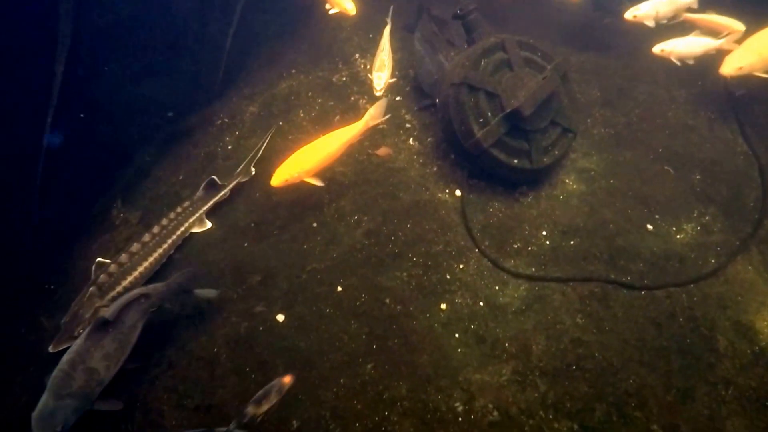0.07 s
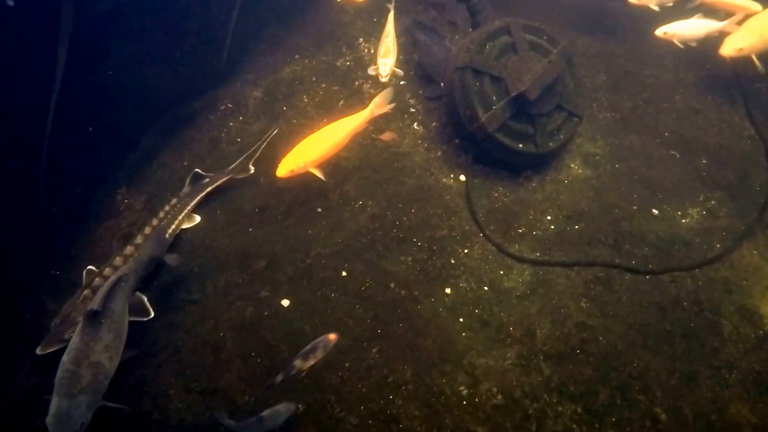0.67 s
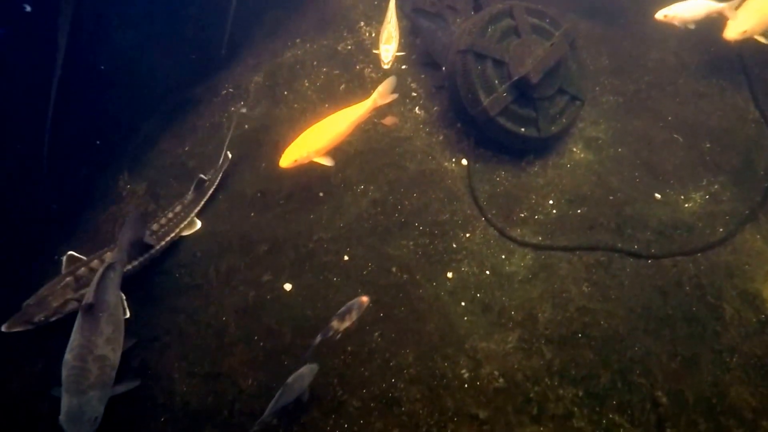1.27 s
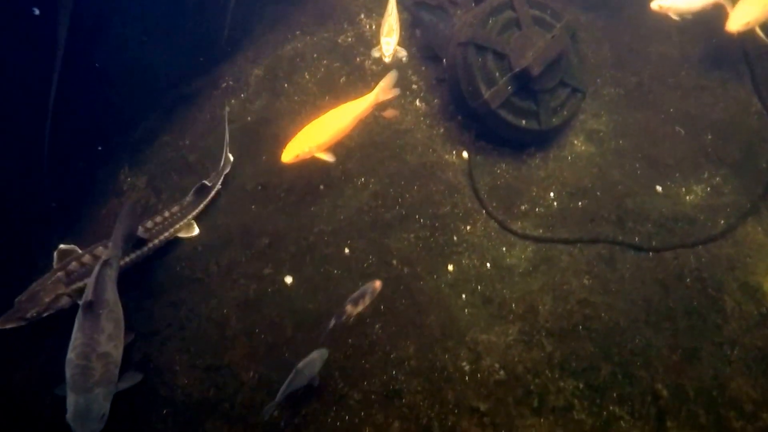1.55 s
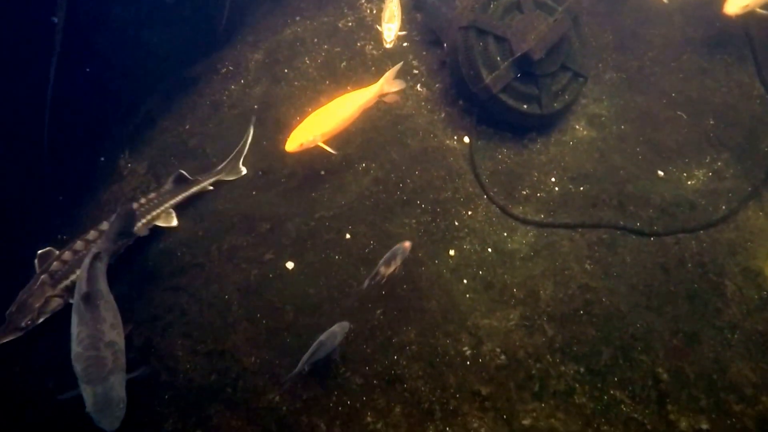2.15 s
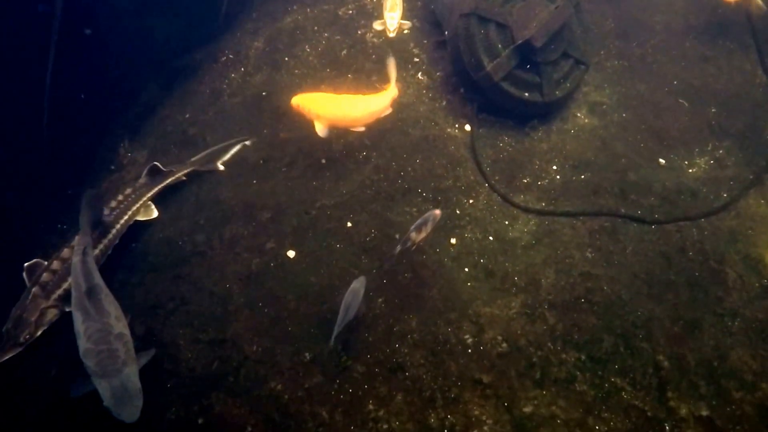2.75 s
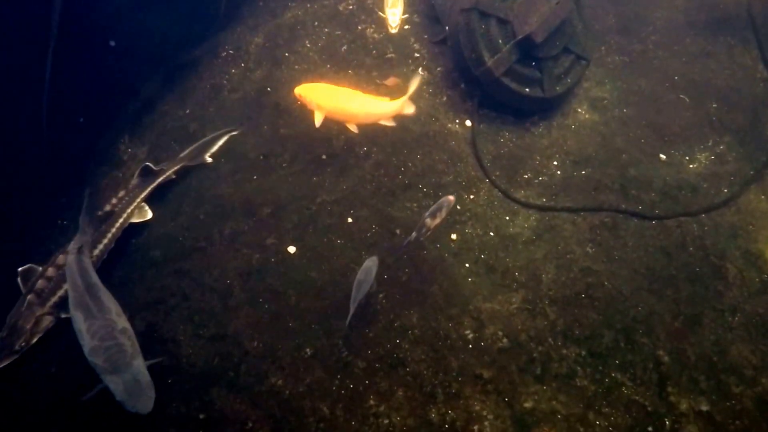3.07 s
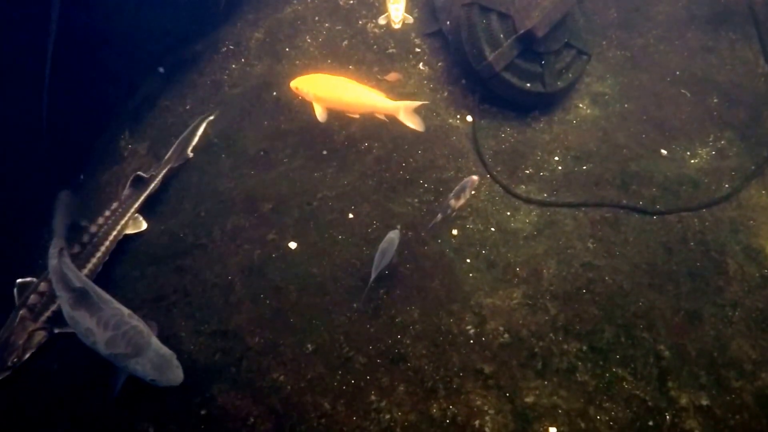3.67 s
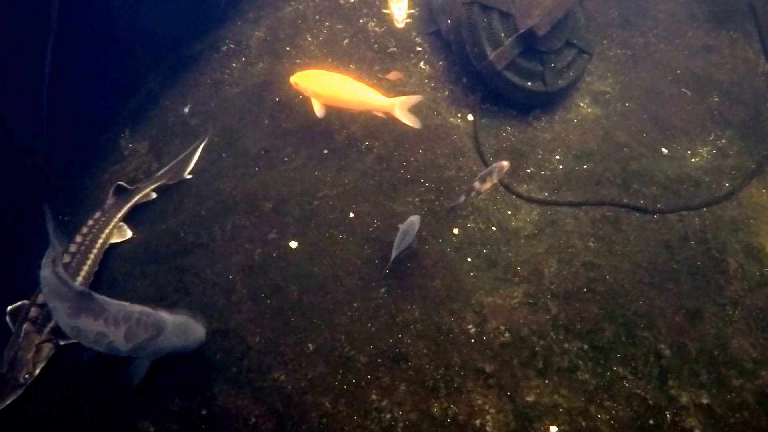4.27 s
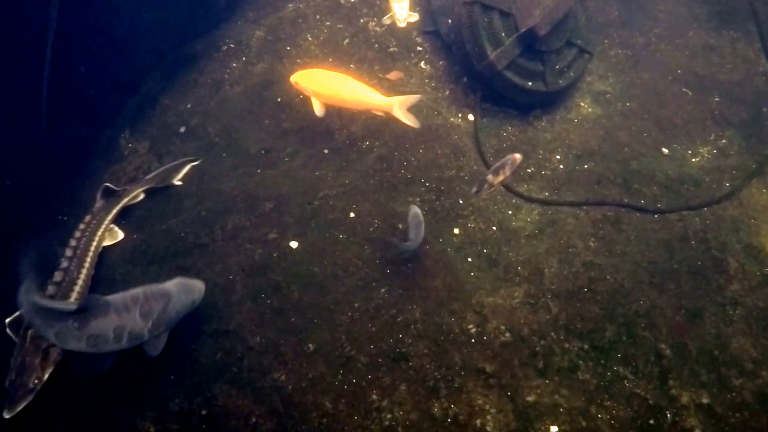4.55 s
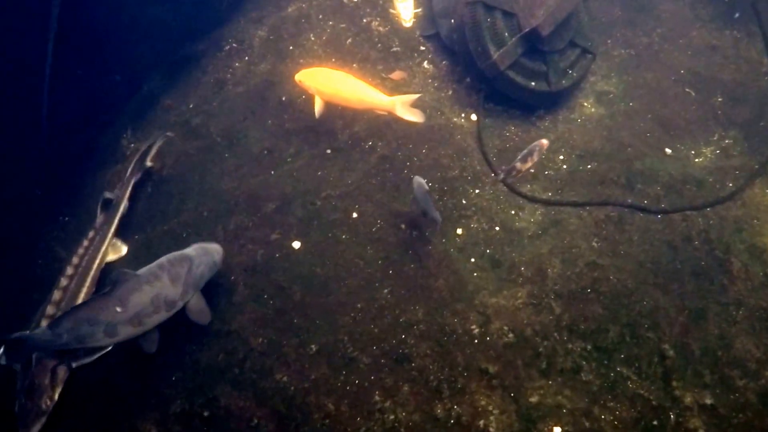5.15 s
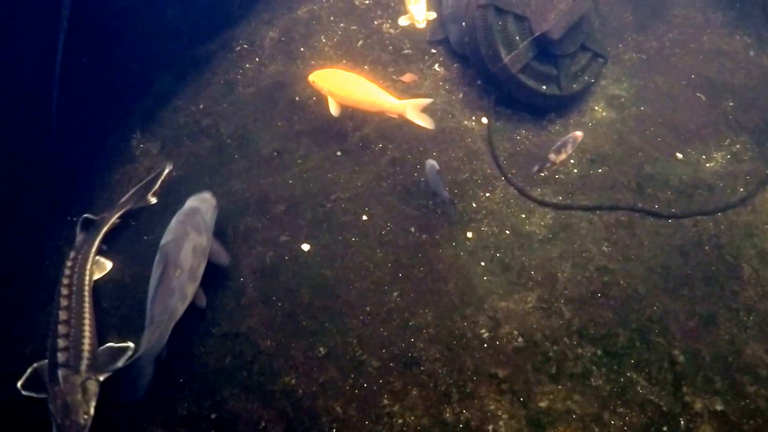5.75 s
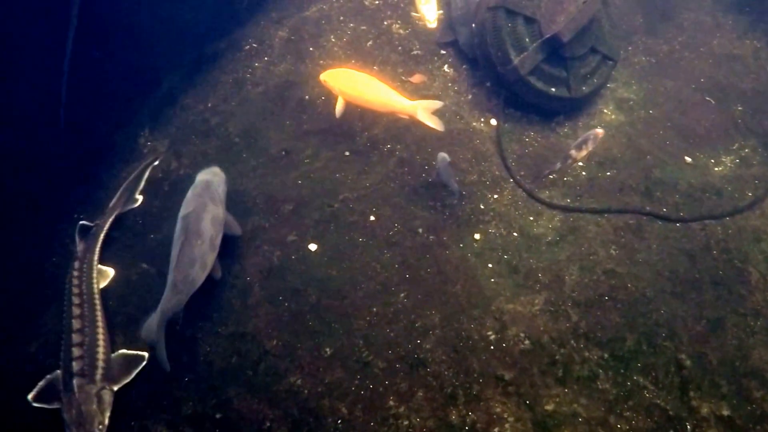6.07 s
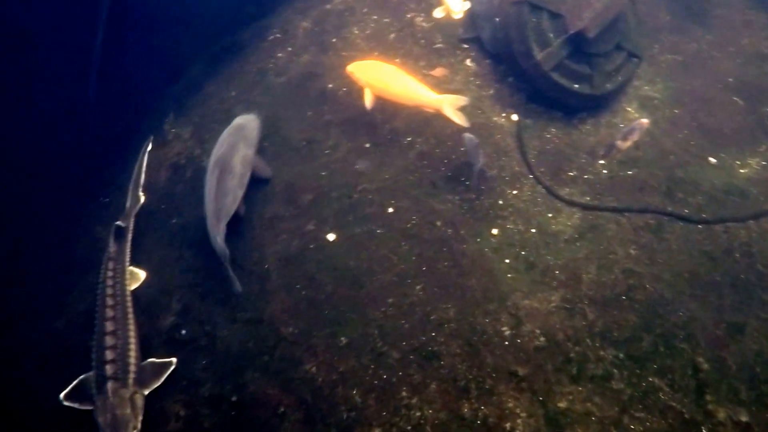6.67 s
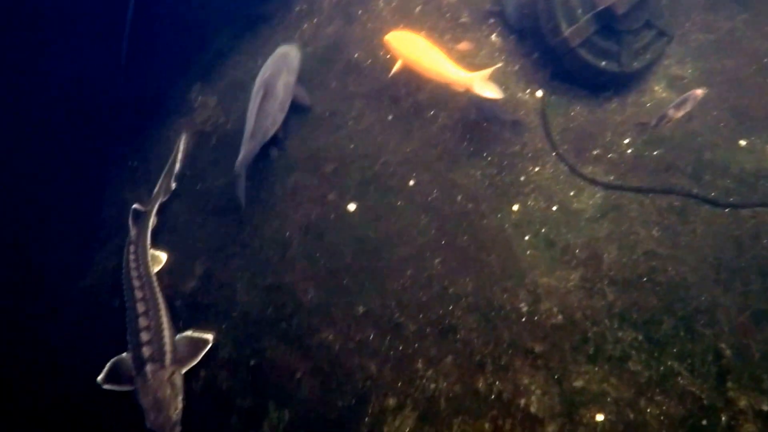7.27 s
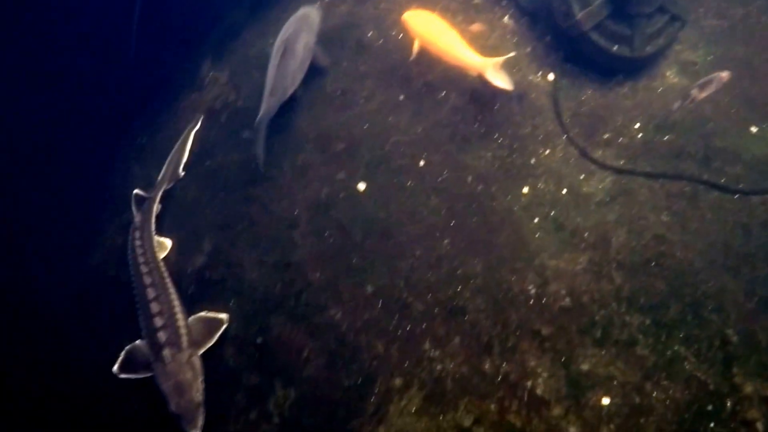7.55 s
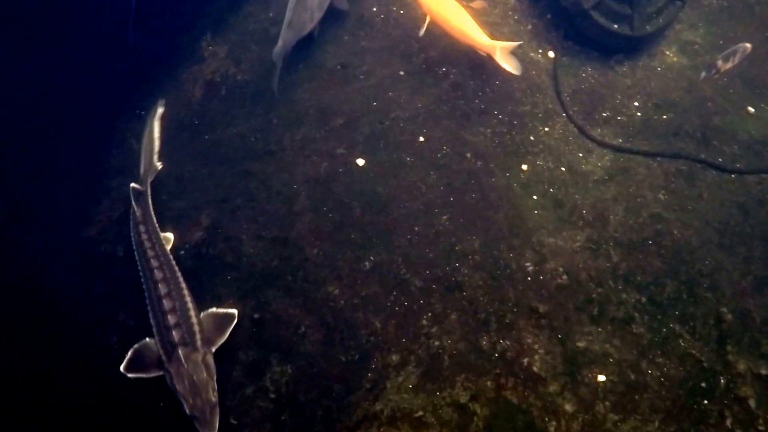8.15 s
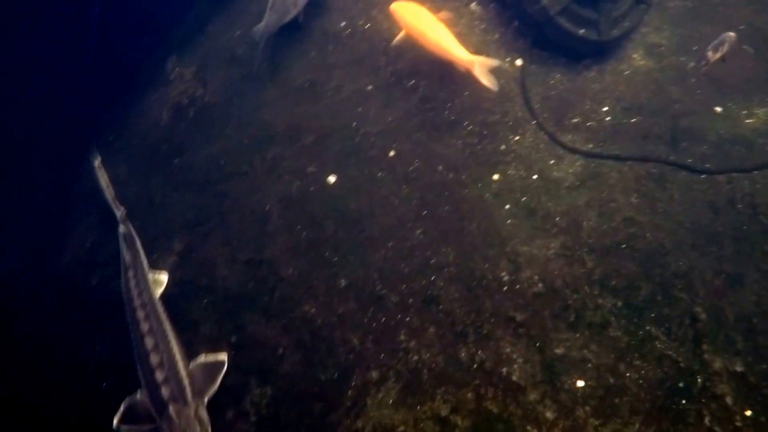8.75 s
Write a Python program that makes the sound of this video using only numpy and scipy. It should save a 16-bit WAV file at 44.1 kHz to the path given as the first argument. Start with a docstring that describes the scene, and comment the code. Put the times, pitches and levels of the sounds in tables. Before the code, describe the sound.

Low underwater pump drone with soft water thuds and faint bubbles, interrupted by hollow rubbing and hard knocks on the microphone housing.

```python
"""A low hum under water: a pump in a garden pond, droning at twice the mains frequency over its own churn.
Swirls of water thump against a camera housing, flexing its wall, and small bubbles ring and tick.
Midway a hollow rush rubs along the housing and sounds its resonances while knocks rattle and rock it;
the hardest make the limiter duck. A thin hiss lies behind it all."""
import sys
import numpy as np
from scipy import signal
from scipy.fft import rfft, irfft, next_fast_len
from scipy.io import wavfile
from scipy.ndimage import uniform_filter1d, minimum_filter1d, map_coordinates

SR = 44100
rng = np.random.default_rng(int(sys.argv[2]) if len(sys.argv) > 2 else 0)


def dump(signal):
    """Clip the signal to [-1, 1] and save it as 16-bit WAV at the path in sys.argv[1]."""
    limited = np.clip(np.atleast_2d(signal).T, -1, 1)
    pcm = np.round(limited * 32767).astype(np.int16)
    wavfile.write(sys.argv[1], SR, pcm)


N = 388236

# the pump's hum at the housing: t/s, level/dB
HUM_LEVEL = [(0, -27), (0.15, -27.5), (0.35, -22.5), (0.8, -22.5), (0.97, -28), (1.2, -26.5), (1.36, -30.5),
             (1.62, -22.5), (2.3, -21), (4.85, -20.7), (5.0, -21.5), (5.25, -23.5), (5.52, -29.5),
             (5.88, -22.5), (6.6, -26.5), (7.0, -29), (7.4, -24), (8.8, -22)]
# overtones of the hum: harmonic number, level/dB against the fundamental
HUM_OVERTONES = [(2, -23.5), (3, -29), (4, -30.5), (5, -44), (11, -54)]
# the strongest pushes of water: t/s, strength/dB, nominal f/Hz (the wall sounds lower)
PUSHES = [(0.019, -16, 184), (0.22, -16, 147), (0.372, -6, 166), (0.446, -16.5, 185), (0.54, -17.5, 151),
          (0.757, -15, 130), (0.779, -12, 80), (0.802, -10, 103), (0.826, -12, 116), (0.896, -8.5, 111),
          (1.129, -12.5, 160), (1.163, -14, 121), (1.315, -20, 86.6), (1.624, -15, 157),
          (1.705, -13, 109.5), (2.344, -12.5, 144), (2.722, -11.5, 176), (2.973, -12.5, 129),
          (4.121, -13, 134), (4.809, -10, 192), (4.902, -18.5, 170), (5.161, -16, 201), (5.302, -9, 152.5),
          (5.338, -2, 212), (5.367, -9, 117.6), (5.823, -12, 155), (5.937, -10.5, 139), (6.014, -11.5, 148),
          (6.161, -10, 153), (6.215, -7.5, 172), (6.395, -7.5, 168), (6.462, -13, 189), (6.544, -10, 156.2),
          (6.647, -6.5, 138), (6.708, -18, 152), (6.858, -17.5, 143), (7.02, -14.5, 145), (7.034, -17, 261),
          (7.349, -13.5, 132), (7.368, -13.5, 65), (7.15, -13.5, 157), (7.393, -15, 113), (7.519, -7.5, 45),
          (7.662, -17.5, 163.3), (7.735, -9, 87), (7.892, -8, 44.3), (7.906, -8.5, 149), (8.225, -14, 154),
          (8.396, -15.5, 254), (8.466, -9.5, 125), (8.619, -7, 136.8), (8.768, -11, 159)]
# swirls round the housing: t/s, hold/s, strength/dB
SWIRLS = [(0.208, 0.43, -1), (.75, 0.099, -6.5), (1.117, 0.078, 2.5), (1.244, .2, -7.5), (1.53, .2, 3),
          (5.28, .14, 0), (5.819, 0.16, -3), (6.162, 0.53, 2), (6.773, 0.1302, -5.5), (7.116, .42, -2.5),
          (8.433, .38, -0.5)]
# sharp knocks: t/s, level/dB, nominal f/Hz (the body sounds lower), tick/dB against the body
KNOCKS = [(.895, -34, 560, -15), (1.129, -24, 414, -19), (2.905, -35, 600, -23), (3.527, -18.5, 433, -30),
          (3.968, -7, 396, -24), (4.026, -12, 713, -34), (4.03, 7, 540, -24.5), (4.113, 3, 478, -39),
          (4.512, -7.5, 401, -38), (4.804, -7.5, 446, -21), (4.886, -3, 453, -39), (4.903, -6.5, 243, -17),
          (4.932, 7, 1216, -42), (4.934, 17.5, 450, -33), (4.965, 13.5, 501, -36), (5.038, -8, 203, -24),
          (5.055, -6.5, 740, -24), (5.157, -7, 288, -30), (5.296, -10, 629.3, -35), (5.319, -8.5, 435, -34),
          (5.335, 11, 473, -24), (5.356, 8, 494, -37), (5.395, -1.5, 440, -38), (5.438, -11, 400, -37),
          (5.505, -12, 420, -26), (5.822, -13, 410, -22), (7.031, -24, 395, -16), (7.504, -31.5, 570, -31),
          (7.597, -25.5, 471, -15), (8.396, -36, 375, -14), (8.636, -25.5, 680, -35)]
# swell of the rush: t/s, level/dB
RUSH_LEVEL = [(3.15, -96), (3.42, -45.5), (3.7, -35.5), (4.0, -33.5), (4.3, -29), (5.05, -30),
              (5.35, -40.5), (5.9, -61.5), (6.2, -85.5)]
# colour of water rubbing on the wall: f/Hz, level/dB
RUSH_SPECTRUM = [(30, -11), (100, 7), (230, -8.5), (550, 3), (720, -4), (1000, -9), (1300, -13),
                 (1550, -24.5), (2200, -26.5), (2600, -34), (3400, -37.5), (5200, -34.5), (8000, -41),
                 (14000, -62.5)]
# resonances of the housing: f/Hz, width/Hz, lift/dB
HOUSING_MODES = [(424, 91, 10), (871, 45, 8), (1116, 150, 8.5), (1392, 91, 12.5), (1650, 59, 17),
                 (1850, 41, 9), (2000, 250, 9.5), (2675, 75, 9), (2964, 110, 8)]
# balance of the two ports as the housing rocks: f/Hz, left over right/dB
PORT_TILT = [(60, -5), (200, 5.5), (370, 7.5), (550, 8.5), (700, -2), (900, -5), (1300, -2.5), (2300, -1),
             (8000, -5.5)]
# phase between the rocking ports: f/Hz, left lead/rad
PORT_LEAD = [(60, 1.6), (150, 1.7), (250, 3), (450, 3.91), (700, 3.7), (900, 3), (1300, 1.99), (2300, 1.66),
             (3200, 0.68), (8000, 2.3)]
# bubbles, from tiny ticks to deep plops: t/s, strength/dB, f/Hz, t60/s
BUBBLES = [(.452, -50, 4250, 0.037), (.454, -56, 8000, .03), (.885, -9, 125, .11),
           (1.13, -22.5, 298, 0.063), (2.948, -55, 4660, 0.037), (2.95, -51.5, 9040, .025),
           (3.62, -53, 5350, 0.035), (4.19, -47.5, 4400, 0.041), (4.265, -49, 5160, .041),
           (4.495, -45, 3020, .037), (4.78, -45.5, 4650, 0.045), (4.822, -28.5, 1374, 0.082),
           (5.916, -25.5, 596, .028), (6.775, -59, 6300, .05), (8.215, -53.5, 4420, 0.036),
           (8.295, -55, 4245, 0.035), (8.631, -20, 990, 0.021)]
# colour of the water's slow sway: f/Hz, level/dB
RUMBLE_SPECTRUM = [(5, -19), (14, -11), (28, -2.5), (55, -5), (85, -8.5), (130, -14.5), (250, -64),
                   (500, -120)]
# colour of the lumpy churn: f/Hz, level/dB
CHURN_SPECTRUM = [(40, -33), (110, 3), (170, 3), (260, -11.5), (400, -24.5), (600, -50.5), (1200, -120)]
# flow through the pump: t/s, level/dB
FLOW_LEVEL = [(0, -42.5), (1.2, -43), (2.3, -42), (3.4, -41.5), (3.7, -45.5), (4.4, -38), (4.9, -39.5),
              (5.1, -44), (5.65, -49.5), (6.05, -42), (8.1, -45.5), (8.8, -42)]
# colour of that flow: f/Hz, level/dB
FLOW_SPECTRUM = [(100, -19.5), (260, 2.5), (330, 0.5), (420, -3), (480, -12.5), (570, -17), (690, -17),
                 (780, -17), (880, -20.5), (1080, -18.5), (1250, -26), (2000, -35.5), (3200, -46.5),
                 (6000, -81)]
# resonances of the pump and its pipe: f/Hz, width/Hz, lift/dB
PIPE_MODES = [(297, 25, 7.5), (353, 9.2, 1.5), (402, 35, 6.5), (435, 5.3, 6), (555, 43, 6.5),
              (670, 34, 6.5), (882, 50, 8), (1060, 87, 3)]
# swells of the pipe's drone: t/s, level/dB
DRONE_LEVEL = [(0, -64), (1.7, -57), (2.3, -44), (3.3, -43.5), (3.65, -58.5), (5.8, -69), (6.1, -46.5),
               (6.9, -52), (8.8, -71)]
# colour of the drone: f/Hz, level/dB
DRONE_SPECTRUM = [(240, -49.5), (330, -4), (400, 0.5), (450, -6), (520, -15), (700, -59)]
# colour of the hiss: f/Hz, level/dB
HISS_SPECTRUM = [(300, -29.5), (1500, 7), (3300, -5), (3900, -2), (6300, -3), (7400, -4.5), (8600, 0.5),
                 (10000, -0.5), (12000, -7.5), (13800, -12.5), (15200, -33)]
# stereo width of the hiss: f/Hz, side against mid/dB
HISS_WIDTH = [(3000, -31), (9500, -29), (11500, -13), (14000, 0.5)]


def pump_hum(hum_hz=100):
    """The motor's magnetic hum and weak overtones, growing and fading on their way through the water."""
    phase = 2 * np.pi * hum_hz * np.arange(N) / SR
    tone = np.cos(phase)
    for harmonic, db in HUM_OVERTONES:
        gain = amp(db + 3.16 * wobble(2.7))
        tone += gain * np.cos(round(harmonic) * phase + rng.uniform(0, 2 * np.pi) + 0.32 * wobble(6.6))
    return np.sqrt(2) * amp(fader(HUM_LEVEL) + 0.17 * wobble(6.8)) * tone


def thuds(loose_db=21.5):
    """Soft pushes of water flex the wall slowly; while the rush pulls at the housing they also rock it."""
    thumps = np.zeros(N)
    pushes = list(PUSHES) + eddies()
    for (s, db, hz), turn in zip(pushes, rng.uniform(0, 2 * np.pi, len(pushes))):
        wave, peak_s = wall_flex(hz * 0.77, below=1.0, above=0.48, sweep=3.04, turn=turn)
        add(thumps, s - peak_s, amp(db + 1) * wave)
    rocking = np.clip(amp(fader(RUSH_LEVEL) + loose_db), 0, 1) * thumps
    return thumps + np.array([rocking, far_port(rocking)])


def eddies(per_s=14, level_db=-18.5, scatter_db=2.5, nominal_hz=150, scatter_oct=0.33):
    """Small, unevenly spaced pushes that follow the strength of the swirl shedding them; rows as PUSHES."""
    jitter, sizes, pitches = rng.standard_normal((400, 3)).T
    times = (np.arange(len(jitter)) + .3 * jitter) / per_s
    strength = np.interp(times, np.arange(N) / SR, swirling(), right=0)
    return [(s, level_db + 20 * np.log10(gain) + scatter_db * size, nominal_hz * 2 ** (scatter_oct * pitch))
            for s, gain, size, pitch in zip(times, strength, sizes, pitches) if gain > .1]


def swirling(attack_s=.025, release_s=.05):
    """Strength of the swirling as a gain: each swirl rises, holds and dies away."""
    t = np.arange(N) / SR
    strength = np.zeros(N)
    for s, hold_s, db in SWIRLS:
        rise = np.clip((t - s) / attack_s + 1, 0, 1)
        fall = np.exp(-np.maximum(t - s - hold_s, 0) / release_s)
        strength += amp(db) * rise * fall
    return strength


def knocks(tick_ahead_s=0.0014, rock_from_db=-23.5, rock_span_db=8.5, crack_hz=2500, crack_from_db=-20.5):
    """Hard contacts flex the wall fast, a bright tick running ahead; strong ones rock the whole housing."""
    centred, rocking = np.zeros((2, N))
    for (s, db, hz, tick_db), turn in zip(KNOCKS, rng.uniform(0, 2 * np.pi, len(KNOCKS))):
        body, peak_s = wall_flex(hz * .85, below=.68, above=.38, sweep=4, turn=turn)
        tick, _ = wall_flex(hz * 2.44, below=.44, above=.27, sweep=4.8, turn=turn)
        tick = np.roll(tick, round((peak_s - tick_ahead_s) * SR) - np.argmax(abs(tick)))
        wave = amp(db) * (body + amp(tick_db) * tick)
        rock_share = np.clip((db - rock_from_db) / rock_span_db, 0, 0.99)
        add(centred, s - peak_s, (1 - rock_share) * wave)
        add(rocking, s - peak_s, rock_share * wave)
        if db + tick_db > crack_from_db:  # only the very hardest blows also crack
            crack, crack_peak_s = wall_flex(crack_hz, below=.6, above=.42, sweep=2.5, turn=turn)
            add(rocking, s - crack_peak_s, amp(db + tick_db - 7) * crack)
    return centred + np.array([rocking, far_port(rocking)])


def wall_flex(hz, below, above, sweep, turn, size=16384):
    """A few falling cycles, as bending waves bring their highs first; returns the wave and its peak time."""
    log_ratio = np.log((np.fft.rfftfreq(size, 1 / SR) + 1e-3) / hz)
    width = np.where(log_ratio < 0, below, above)
    band = np.exp(-.5 * (log_ratio / width) ** 2)
    phase = turn - sweep * log_ratio
    wave = np.fft.fftshift(np.fft.ifft(band * np.exp(1j * phase), size))
    peak = np.argmax(abs(wave))
    return wave.real / abs(wave[peak]), peak / SR


def far_port(left):
    """Rocking drives the housing's two ports against each other: the right one's answer to the left."""
    return filtered(left, lambda hz: amp(-along(PORT_TILT, hz)) * np.exp(-1j * along(PORT_LEAD, hz)))


def rush(spread=0.49):
    """Water rubs along the housing, rocks it and sounds its hollow resonances."""
    left, right = noise(RUSH_SPECTRUM) + spread * np.array([noise(RUSH_SPECTRUM), noise(RUSH_SPECTRUM)])
    rub = resonate(np.array([left, far_port(right)]), HOUSING_MODES)
    return amp(fader(RUSH_LEVEL) + 0.89 * wobble(25)) * unit(rub)


def bubbles(attack_s=0.0041, unsteadiness=0.3):
    """Each bubble rings briefly, its pitch so unsteady that the tiny ones crackle."""
    track = np.zeros(N)
    t = np.arange(SR // 8) / SR
    for s, db, hz, t60 in list(BUBBLES) + torn_bubbles():
        flutter = uniform_filter1d(rng.standard_normal(len(t)), size=int(SR / hz) + 1)
        pitch_hz = hz * (1 + unsteadiness * flutter)
        envelope = 2 * amp(db - 60 * t / t60) * (1 - np.exp(-t / attack_s))
        add(track, s, envelope * np.sin(2 * np.pi * np.cumsum(pitch_hz) / SR))
    return track


def torn_bubbles(count=14, offset_db=-19, centre_hz=5600, t60_s=0.031):
    """The rush tears off tiny bubbles at random, their strength following its own; rows as BUBBLES."""
    rush_s, rush_db = np.transpose(RUSH_LEVEL)
    moments, octaves = rng.uniform(size=(count, 2)).T
    times = rush_s[1] + (rush_s[-3] - rush_s[1]) * moments
    return [(s, np.interp(s, rush_s, rush_db) + offset_db, centre_hz * 2 ** (octave - .5), t60_s)
            for s, octave in zip(times, octaves)]


def water_bed(calm_rumble_db=-30, swirl_rumble_db=-27.5, calm_churn_db=-42.5, swirl_churn_db=-33):
    """Slow sway and lumpy churn, both lifted by the swirls, and the flow through the pump's pipe."""
    swirl = swirling()
    rumble_gain = np.hypot(amp(calm_rumble_db), amp(swirl_rumble_db) * swirl)
    rumble = rumble_gain * amp(1.6 * wobble(4)) * noise(RUMBLE_SPECTRUM)
    churn_gain = np.hypot(amp(calm_churn_db), amp(swirl_churn_db) * swirl)
    churn = churn_gain * amp(3.5 * wobble(35)) * noise(CHURN_SPECTRUM)
    flow_gain = amp(fader(FLOW_LEVEL) + 1.3 * wobble(8.9))
    flow = flow_gain * unit(resonate(noise(FLOW_SPECTRUM), PIPE_MODES))
    return rumble + churn + flow


def pipe_drone():
    """A narrow, hollow resonance of the pump's pipe swells and fades."""
    return amp(fader(DRONE_LEVEL) + 1.2 * wobble(7.1)) * noise(DRONE_SPECTRUM)


def hiss(level_db=-63):
    """A thin, even hiss, wide only at the very top."""
    side = filtered(noise(HISS_SPECTRUM), lambda hz: amp(along(HISS_WIDTH, hz)))
    return amp(level_db) * (noise(HISS_SPECTRUM) + np.array([side, -side]))


def limiter(x, limit_db, release_s=0.19, linger_share=0.38, linger_db_per_s=7, window=128):
    """Peaks over the limit duck the gain just ahead of them; it returns quickly at first, then slowly."""
    t = np.arange(N) / SR
    peak_db = 20 * np.log10(abs(x).max(axis=0) + 1e-9)
    over_db = np.maximum(peak_db - limit_db, 1e-9)
    quick_db = np.exp(np.maximum.accumulate(np.log(over_db) + t / release_s) - t / release_s)
    slow_db = np.maximum.accumulate(linger_share * over_db + linger_db_per_s * t) - linger_db_per_s * t
    gain_db = minimum_filter1d(-np.maximum(quick_db, slow_db), size=window)
    return x * amp(uniform_filter1d(gain_db, size=window))


def amp(db):
    """Decibels to gain."""
    return 10 ** (np.asarray(db) / 20)


def unit(x):
    """Scale to rms 1."""
    return x / np.sqrt(np.mean(x ** 2) + 1e-20)


def along(points, hz):
    """Read rows of f/Hz, value on a log frequency axis."""
    f, values = np.transpose(points)
    return np.interp(np.log(hz + 1), np.log(f + 1), values)


def fader(points):
    """A level for every sample, from rows of t/s, level/dB."""
    return np.interp(np.arange(N) / SR, *np.transpose(points))


def wobble(rate):
    """A smooth random curve, rate knots a second."""
    knots = rng.standard_normal(int(N * rate / SR) + 4)
    return map_coordinates(knots, [np.arange(N) * rate / SR])


def filtered(x, response):
    """Shape x with a complex response of frequency."""
    size = next_fast_len(N + SR // 2)
    return irfft(rfft(x, size) * response(np.fft.rfftfreq(size, 1 / SR)), size)[..., :N]


def resonate(x, modes):
    """Colour x with a bell-shaped lift at each resonance."""
    return filtered(x, lambda hz: amp(sum(db / (1 + (2 * (hz - f) / width) ** 2) for f, width, db in modes)))


def noise(spectrum):
    """Noise of rms 1 with the given colour."""
    return unit(filtered(rng.standard_normal(N), lambda hz: amp(along(spectrum, hz))))


def add(track, s, sound):
    """Mix a sound into a track from time s on."""
    start = round(s * SR)
    part = sound[max(-start, 0):max(N - start, 0)]
    track[max(start, 0):][:len(part)] += part


def scene():
    """Pump and water sit in the middle; the rush and the knocks spread to the sides."""
    return pump_hum() + pipe_drone() + water_bed() + hiss() + rush() + bubbles() + knocks() + thuds()


def record(dry, split_hz=246, ceiling=0.95, top_hz=15150):
    """Bass and treble are limited apart, peaks clip, the ends are eased and the very top is cut."""
    bass = filtered(dry, lambda hz: 1 / (1 + (hz / split_hz) ** 4))
    held = limiter(bass, limit_db=-5) + limiter(dry - bass, limit_db=-3.5)
    ease = signal.windows.tukey(N, .0012)
    return filtered(ease * np.clip(held, -ceiling, ceiling), lambda hz: hz < top_hz)


dry = scene()
out = record(dry)
dump(out)
```